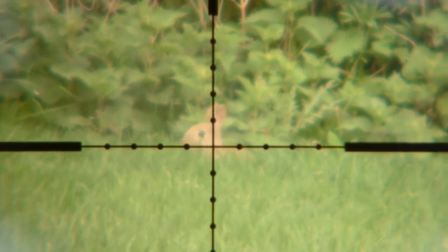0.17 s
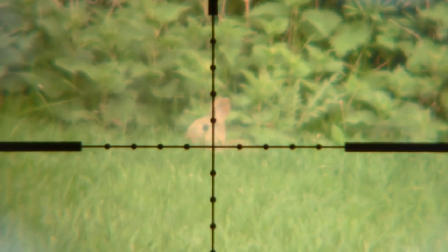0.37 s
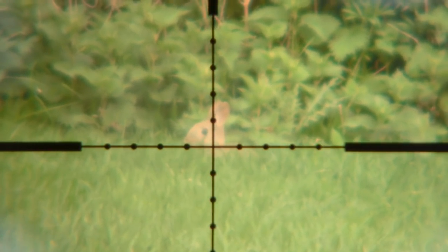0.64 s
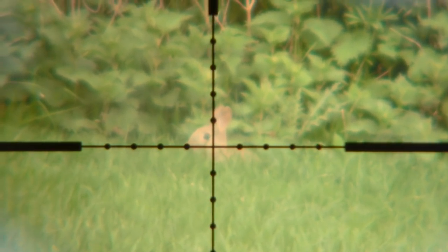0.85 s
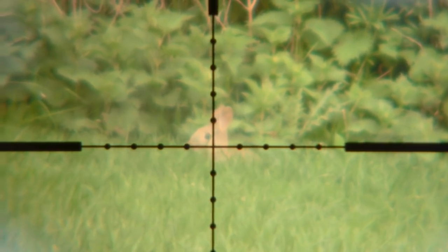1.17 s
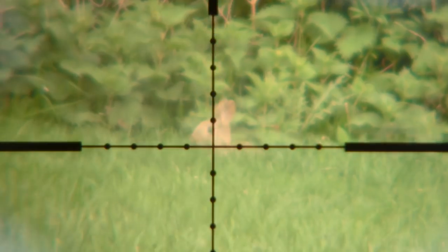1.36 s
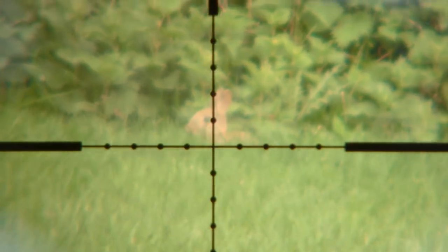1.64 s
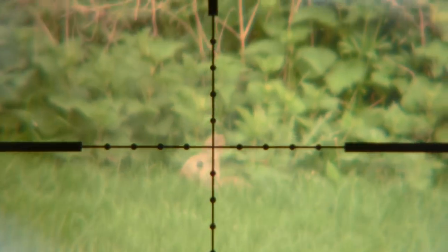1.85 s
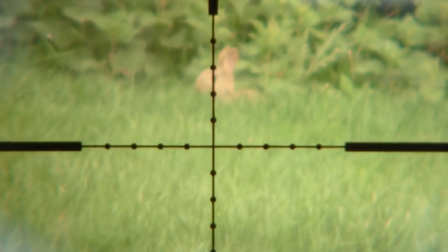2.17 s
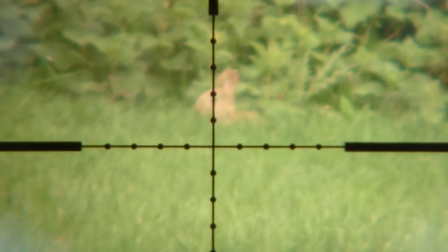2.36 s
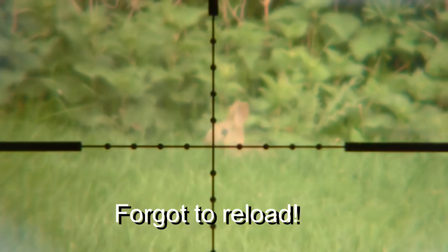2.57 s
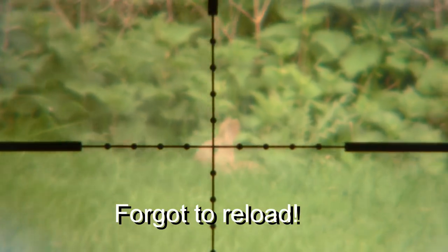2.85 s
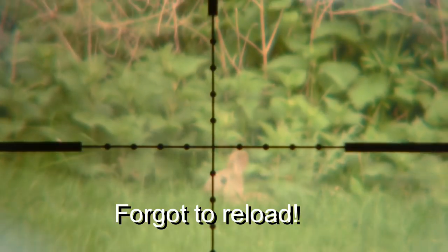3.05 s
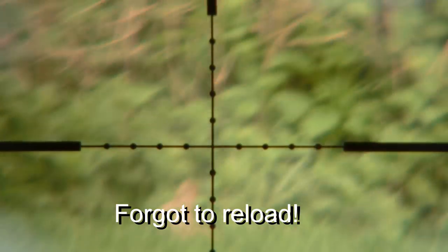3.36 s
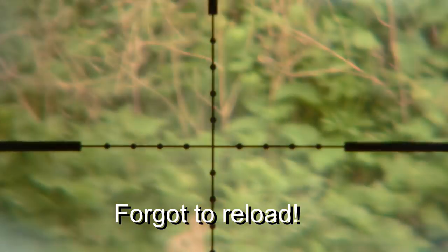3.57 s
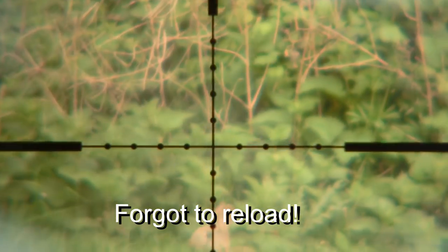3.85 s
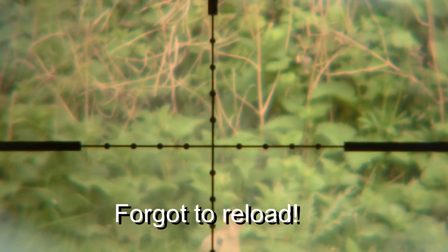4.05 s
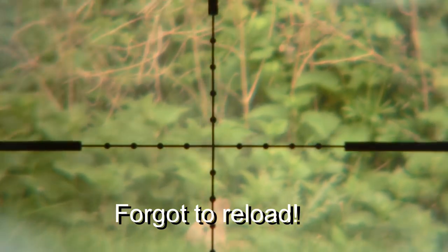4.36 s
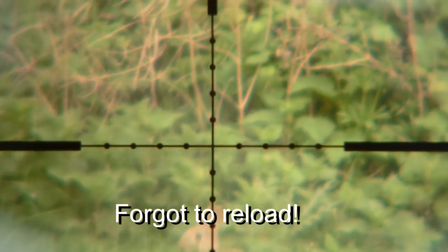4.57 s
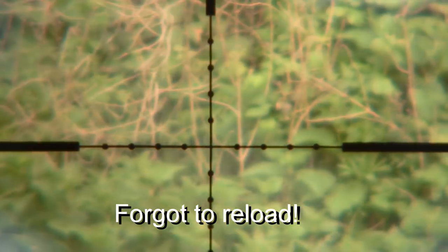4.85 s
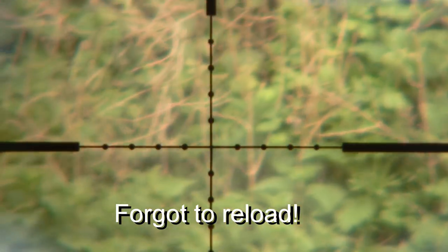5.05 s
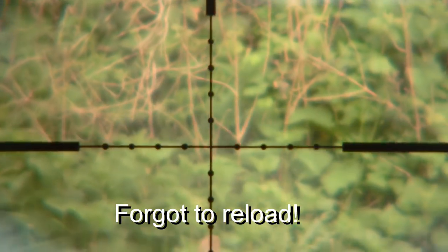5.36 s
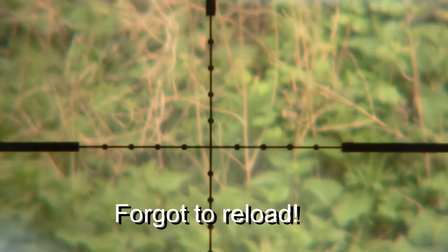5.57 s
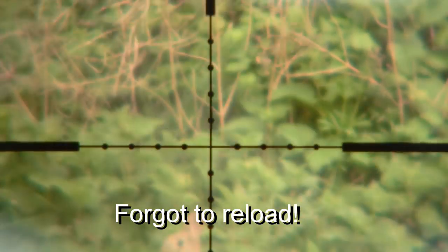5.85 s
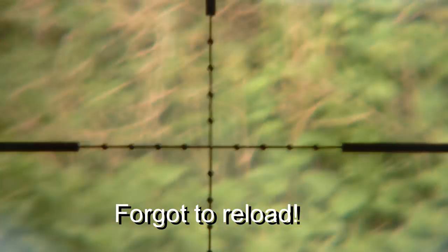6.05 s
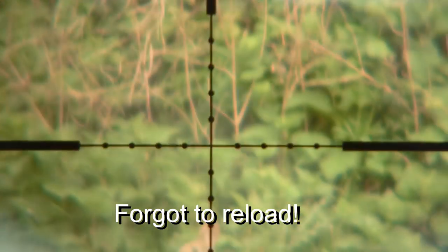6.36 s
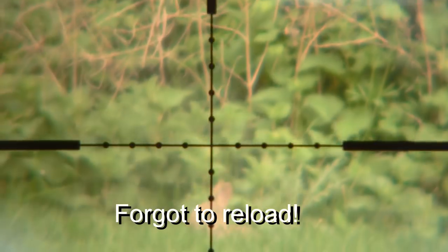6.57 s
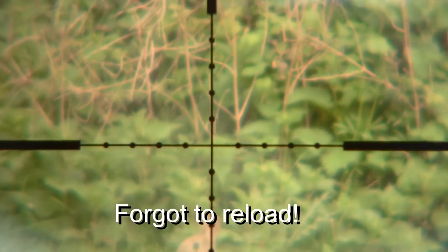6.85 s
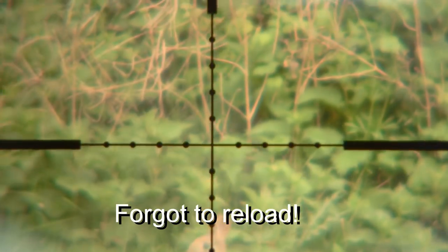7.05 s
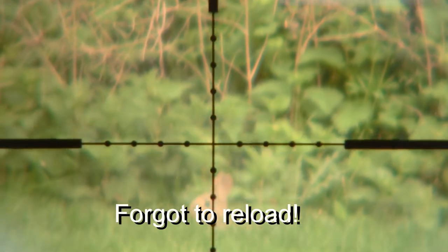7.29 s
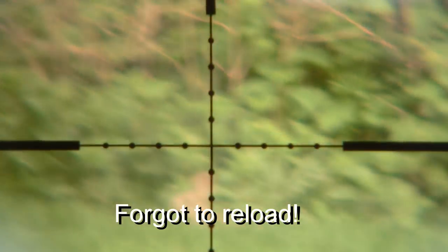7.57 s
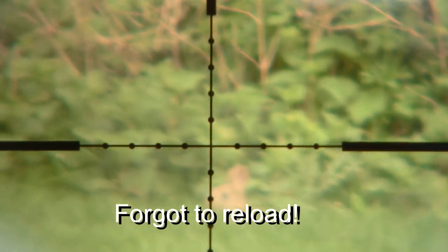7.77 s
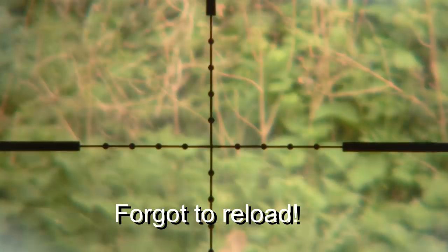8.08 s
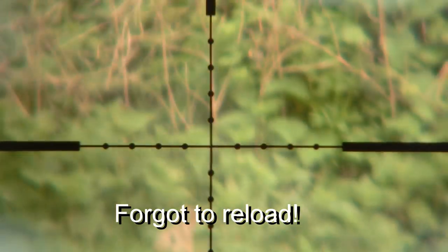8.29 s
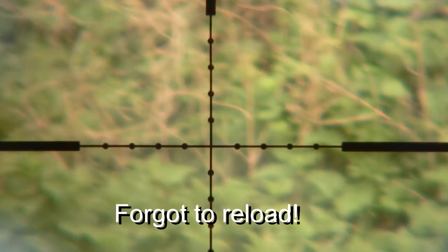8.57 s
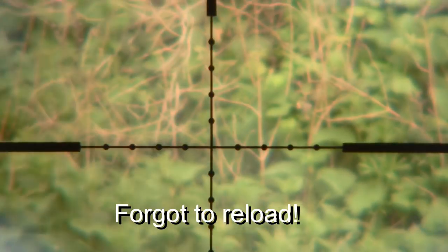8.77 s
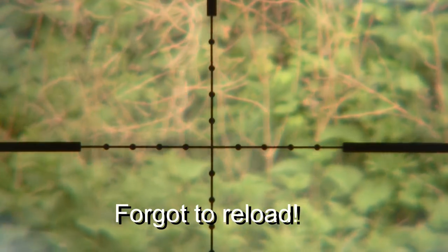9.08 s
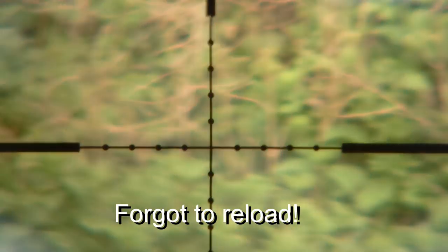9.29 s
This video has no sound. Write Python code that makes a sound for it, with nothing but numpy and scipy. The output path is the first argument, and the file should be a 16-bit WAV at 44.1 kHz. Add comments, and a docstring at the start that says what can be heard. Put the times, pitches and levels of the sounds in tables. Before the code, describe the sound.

Small bird chirps over soft outdoor hush, a rifle striker falls with an empty knock, then sharp metallic bolt clacks, taps and scrapes follow.

```python
"""A rifle with a camera on its scope is handled at the edge of a field.
The striker falls with a hollow pop, then the bolt is drawn, rattled and shut; contacts ring dying sines and
filtered noise for stock and steel, the softer the duller. Hand and sleeve add taps, rubbing, thumps and scrapes.
A small bird chirps in gliding tones from the hedge over a distant rush of noise; the background dips once."""
import sys
import numpy as np
from scipy import signal
from scipy.fft import rfft, irfft, next_fast_len
from scipy.io import wavfile
from scipy.ndimage import uniform_filter1d

SR = 44100
rng = np.random.default_rng(int(sys.argv[2]) if len(sys.argv) > 2 else 0)


def output_pcm(signal):
    """Save a mono or channel-first signal as 16-bit PCM at the path in sys.argv[1].

    Samples are clipped to [-1, 1] before scaling.
    """
    pcm = np.clip(np.atleast_2d(signal).T, -1, 1) * 32767
    wavfile.write(sys.argv[1], SR, np.round(pcm).astype(np.int16))


N = 415422
TIME = np.arange(N) / SR

# Clear modes of the rifle. Each row: pitch in Hz, level in dB, t60 in s, before each contact's own factors.
RIFLE_MODES = [(146, -19, 0.023), (230, -21.5, 0.034), (389.3, -3, 0.1), (475.4, -1, 0.043),
               (594, -1.5, 0.07), (643, 3, 0.058), (801, -8.5, 0.09), (910, -2, 0.03), (1088, 3, 0.046),
               (1400, -10, .035), (1546, 5, 0.036), (1905, -0.5, 0.055), (2074, 2.5, 0.039),
               (2280, -18.5, .035), (2860, -7, .03), (3244, 0, 0.054), (3680, -2.5, 0.054),
               (4320, 1, 0.028), (5380, 0, 0.0063), (7250, -3.5, 0.025), (7960, -10, 0.018),
               (8710, -3, 0.024), (10340, -9.5, 0.022), (12100, -4, 0.054)]
# Strokes of fingers and sliding steel along the rifle. Each row: start in s, length in s, level in dB.
STROKES = [(1.152, .8, -59.5), (2.287, .3, -57), (5.637, 0.26, -49), (6.038, .2, -42.5), (6.099, 0.94, -63),
           (7.4, .6, -58.5), (7.905, 0.83, -55), (9.156, 0.49, -60.5)]


def amp(db):
    """Decibels to gain."""
    return 10 ** (np.asarray(db) / 20)


def unit(x):
    """Scales to rms 1."""
    return x / np.sqrt(np.mean(x ** 2) + 1e-20)


def at_hz(points, hz):
    """Reads a spectrum on a log-frequency axis."""
    f, value = np.transpose(points)
    return np.interp(np.log(hz + 1), np.log(f + 1), value)


def level(curve):
    """Gain over the whole scene from rows of (s, dB)."""
    return amp(np.interp(TIME, *np.transpose(curve)))


def add(mix, s, sound):
    """Adds a sound at time s."""
    part = mix[round(s * SR):][:len(sound)]
    part += sound[:len(part)]


def colour(x, points, turn=1):
    """Filters by a spectrum in dB; turn shifts the phase."""
    size = next_fast_len(N + 4096)
    gain = amp(at_hz(points, np.fft.rfftfreq(size, 1 / SR)))
    return irfft(rfft(x, size) * turn * gain, size)[:N]


def drift(low_hz, high_hz):
    """Irregular waver of rms 1 from sines of random phase, the slower the stronger."""
    t = TIME[::256]
    rates_hz = np.geomspace(low_hz, high_hz, 24)
    waves = sum(np.sin(2 * np.pi * (f * t + rng.random())) / np.sqrt(f) for f in rates_hz)
    return np.interp(TIME, t, unit(waves))


def ring(modes, t):
    """Dying sines of alternating sign from rows of (Hz, dB, t60 s)."""
    return sum((-1) ** k * amp(db - 60 * t / t60) * np.sin(2 * np.pi * hz * t)
               for k, (hz, db, t60) in enumerate(modes))


def blow(x, db):
    """Gives a short sound the energy of 10 ms at this level."""
    return amp(db) * x * np.sqrt(SR / 100 / np.sum(x ** 2))


def ports(x, side):
    """Two close microphone ports hear one sound a little out of phase; which one leads changes with frequency."""
    hz = np.fft.rfftfreq(next_fast_len(N + 4096), 1 / SR)
    lead = np.tanh(4 * np.sin(2 * np.pi * np.log2(hz + 100)))
    difference = colour(x, side, turn=1j * lead)
    return np.array([x + difference, x - difference])


def echo(x, stretch):
    """Diffuse tail from leaves and ground, each band dying at its own speed."""
    # Echo off grass and hedge. Each row: frequency in Hz, t60 in s before the stretch.
    field_decay = [(150, .2), (700, 0.4), (2000, 0.33), (8000, 0.44), (15000, 0.1)]
    hz, t, z = signal.stft(rng.standard_normal(SR), SR, nperseg=256)
    decay = amp(-60 * t / (stretch * at_hz(field_decay, hz)[:, None]))
    onset = 1 - np.exp(-t / 0.0044)
    tail = signal.istft(z * decay * onset, SR)[1]
    return signal.fftconvolve(x, tail / np.linalg.norm(tail))[:N]


def dip():
    """Gain of the background: a quick fall, a hold and a slower recovery."""
    start_s, fall_s, hold_s, recover_s, depth_db = 4.69, 0.09, 0.63, 0.18, -4
    corners = start_s + np.cumsum([0, fall_s, hold_s, recover_s])
    return amp(np.interp(TIME, corners, [0, depth_db, depth_db, 0]))


def outdoors(air_db=-54.5, rush_db=-2, gust_db=0.4):
    """Steady rumble and hiss outside the dip, and a distant rush that swells slowly: noise, partly unlike per port."""
    # Spectrum of the open air. Each row: frequency in Hz, relative density in dB per Hz.
    air = [(12, -39.5), (20, -12), (65, 3), (123, -12.5), (277, -14.5), (446, -11), (642, -7), (738, -5),
           (897, -9.5), (1150, -20.5), (1610, -23), (2820, -28), (3630, -28.5), (14300, -34.5),
           (16000, -47)]
    # Spectrum of the distant rush. Each row: frequency in Hz, relative density in dB per Hz.
    rush = [(330, -25), (430, -18.5), (520, -12.5), (700, -1), (850, 0.5), (1020, -6), (1300, -18.5),
            (2200, -45.5), (5000, -44.5)]
    # Swell of the rush. Each row: time in s, level in dB before rush_db and the gusts.
    rush_swell = [(0.0, -59), (0.5, -62.5), (1.31, -51.5), (2.1, -61), (2.62, -56.5), (3.15, -60.5),
                  (3.57, -58), (4.09, -59.5), (4.54, -55), (4.83, -60), (6.09, -59.5), (6.19, -51.5),
                  (7.24, -54.5), (7.9, -51), (8.47, -44.5), (9.42, -48.5)]
    # Spread between the ports. Each row: frequency in Hz, side over mid in dB.
    air_side = [(60, -13), (130, -1), (290, -2), (700, -21.5), (1300, -7.5), (2400, -1.5), (4400, -1.5),
                (8000, 0.5), (15000, 0)]
    swell = level(rush_swell) * amp(rush_db + gust_db * drift(0.73, 13))
    mid, side = (dip() * amp(air_db) * unit(colour(rng.standard_normal(N), air))
                 + swell * unit(colour(rng.standard_normal(N), rush)) for _ in range(2))
    side = colour(side, air_side)
    return np.array([mid + side, mid - side])


def rubbing(resting_db=-69.5, slips_per_s=700, spread_db=4, hiss_db=-6, damping=0.51, arch=3.9):
    """Tiny slips of uneven size tap the rifle's modes, damped by the hand; each stroke swells and fades."""
    pressure = np.full(N, amp(resting_db))  # the hand that only holds the rifle
    for start, length, db in STROKES:
        arc = abs(np.sin(np.linspace(0, np.pi, round(length * SR))))
        add(pressure, start, amp(db) * arc ** arch)
    sizes = amp(spread_db * np.minimum(rng.exponential(1, N), 4))
    slips = (rng.random(N) < slips_per_s / SR) * rng.choice([-1, 1], N) * sizes
    damped = [(hz, db, t60 * damping) for hz, db, t60 in RIFLE_MODES]
    body = signal.fftconvolve(slips, ring(damped, np.arange(SR // 8) / SR))[:N]
    body = unit(body) + amp(hiss_db) * unit(slips)
    tone_db = [(120, 16), (400, 6.5), (650, -6.5), (2000, -14), (5000, -8), (14000, -20)]
    return pressure * unit(colour(body, tone_db))


def note(top_hz, length, wobble, rasp=.1, rasp_db=-5, fade=0.27):
    """One arch of pitch, ending a little lower than it began, with a raspy edge from a jittered second tone."""
    start, end, peak_at = 0.76, 0.75, 0.42  # shares of the top pitch, share of the length
    u = np.linspace(0, 1, round(length * SR))
    rise = np.minimum(u / peak_at, 1)
    fall = np.maximum((u - peak_at) / (1 - peak_at), 0)
    arch = start + (1 - start) * np.sin(np.pi / 2 * rise) - (1 - end) * fall
    pitch = top_hz * arch * wobble[:len(u)]
    jitter = 1 + rasp * unit(uniform_filter1d(rng.standard_normal(len(u)), size=40))
    clear = np.sin(2 * np.pi * np.cumsum(pitch) / SR)
    raspy = np.sin(2 * np.pi * np.cumsum(pitch * jitter) / SR)
    return (clear + amp(rasp_db) * raspy) * signal.windows.tukey(len(u), fade)


def birds(second_db=-2.5, waver=0.021, flutter_db=3.5, direct_db=-2.5, echo_db=-6.5, echo_stretch=1.0):
    """Fluttering two-note chirps and thin whistles, gliding tones blurred by the hedge."""
    # Chirps from the hedge, before throat, flutter and waver. Each row: start in s, top pitch in Hz, level in dB,
    # length of a note in s, delay of the second note in s, its top pitch in Hz.
    chirps = [(.279, 5370, -46.5, 0.05, 0.047, 4220), (0.496, 5330, -51.5, 0.054, 0.047, 4240),
              (.677, 5130, -56.5, 0.043, 0.038, 4080), (1.158, 4650, -53, 0.048, 0.057, 3560),
              (1.518, 5060, -48.5, 0.05, .056, 4040), (1.728, 4270, -57, 0.052, 0.053, 3530),
              (1.907, 4580, -56, 0.057, 0.049, 3560), (2.648, 5070, -60, .045, 0.046, 4040),
              (2.69, 5330, -53.5, 0.049, 0.055, 4230), (3.21, 3980, -68, 0.063, .065, 3320),
              (3.496, 4730, -56.5, 0.057, 0.052, 3590), (3.558, 4310, -56, 0.049, .062, 3480),
              (4.338, 5180, -50, 0.047, 0.044, 4210), (5.071, 4280, -55.5, 0.043, 0.059, 3590),
              (5.239, 4650, -53.5, 0.053, 0.046, 3600), (6.387, 4450, -54.5, 0.042, 0.051, 3630),
              (7.008, 5150, -56.5, 0.042, 0.051, 4060), (8.965, 4590, -56.5, 0.057, 0.049, 3500)]
    # Thin whistles of farther birds, before flutter and waver.
    # Each row: start in s, length in s, first pitch in Hz, last pitch in Hz, level in dB.
    whistles = [(1.002, 0.21, 2140, 2780, -65.5), (3.924, 0.43, 2360, 2292, -67.5),
                (5.332, 0.1, 2305, 2240, -57), (6.28, 0.18, 5960, 5900, -68),
                (6.778, 0.104, 4940, 5300, -64.5), (7.412, .1, 7200, 7160, -70)]
    # The bird's throat. Each row: frequency in Hz, gain in dB.
    throat = [(2500, 2), (3300, -2), (4200, 2), (4900, -5.5), (5600, -7)]
    out = np.zeros(N)
    wobble = 1 + waver * drift(30, 85)
    flutter = amp(flutter_db * drift(25, 90))
    for s, top_hz, db, length, delay, second_hz in chirps:
        for start, hz, note_db in [(s, top_hz, db), (s + delay, second_hz, db + second_db)]:
            add(out, start, amp(note_db) * note(hz, length, wobble[round(start * SR):]))
    out = colour(out, throat)
    for s, length, start_hz, end_hz, db in whistles:
        size = round(length * SR)
        pitch = np.linspace(start_hz, end_hz, size) * wobble[:size] ** .5
        tone = np.sin(2 * np.pi * np.cumsum(pitch) / SR)
        add(out, s, amp(db) * tone * signal.windows.tukey(size, .5))
    song = out * flutter
    return amp(direct_db) * song + amp(echo_db) * echo(song, echo_stretch)


def drive(law, db, dull_db):
    """Levels of the four parts: the softer the contact, the less reaches the high ones."""
    return np.array([db + offset_db - share * dull_db for offset_db, share in law])


def contact(levels, length=0.77, pitch=1.005, detune=0.01, place_db=5.5):
    """A contact rings the clear modes and a thicket of dense ones; steel speaks first, the stock follows."""
    # Stock, receiver, steel and tick. Each row: low edge in Hz, high edge in Hz, rise in s,
    # t60 of the dense modes in s before the length factor, their share in dB.
    parts = [(110, 900, 0.0014, 0.05, -5.5), (900, 2600, 0.0018, 0.046, -2),
             (2500, 5880, 0.00067, 0.023, 4), (6250, 13600, 0.00091, 0.011, 6)]
    out, t = 0, np.arange(SR // 6) / SR
    for db, (low, high, rise, t60, dense_db) in zip(levels, parts):
        band = signal.butter(3, [low, high], "band", fs=SR, output="sos")
        swell = 1 - np.exp(-t / rise)
        burst = rng.standard_normal(len(t)) * swell * amp(-60 * t / (t60 * length))
        dense = signal.sosfilt(band, burst)
        # the place of the blow shifts the modes a little and favours some
        modes = [(hz * pitch * (1 + detune * rng.standard_normal()),
                  mode_db + place_db * rng.standard_normal(), decay * length)
                 for hz, mode_db, decay in RIFLE_MODES if low <= hz < high]
        out = out + blow(unit(swell * ring(modes, t)) + amp(dense_db) * unit(dense), db)
    return out


def hand(tap_db=-4, tap_spread_db=3, tap_dull_db=20, count=4, length=0.83, pitch=1.03):
    """Knocks on the gripped stock; faint taps fall at random in every stroke, strongest in its middle."""
    # Knocks on the stock. Each row: time in s, level in dB, dullness in dB.
    knocks = [(1.153, -50.5, 17), (1.425, -53, 34), (2.456, -42.5, 25), (2.463, -42, 31), (3.366, -45, 57),
              (3.413, -52.5, 27), (5.093, -54.5, 17.5), (5.172, -41.5, 44), (5.812, -49.5, 24),
              (6.057, -41, 18), (6.065, -37.5, 33), (6.183, -45, 19), (6.2236, -39, 27), (6.27, -44.5, 45),
              (6.509, -43, 53), (6.56, -50.5, 51), (7.438, -49.5, 26), (7.467, -39, 54), (7.582, -40, 34),
              (7.609, -37, 20.5), (7.616, -39.5, 32), (7.914, -37, 27), (7.995, -45, 20), (8.02, -41.5, 34),
              (8.204, -44, 40), (8.328, -36, 32), (8.47, -32, 48), (8.553, -38.5, 24.5), (8.766, -46, 30)]
    # How flesh drives stock, receiver, steel and tick. Each row: offset in dB, share of the dullness lost.
    by_hand = [(1, 0.013), (8.5, 0.54), (0, 0.81), (-7.5, 1)]
    # Colour of a blow by the hand. Each row: frequency in Hz, gain in dB.
    flesh = [(150, -2.5), (380, 0.5), (520, 1), (1000, 1.5), (2000, -0.5), (5000, 2)]
    out = np.zeros(N)
    for s, db, dull_db in knocks:
        add(out, s, contact(drive(by_hand, db, dull_db), length, pitch))
    for start, span, db in STROKES:
        for place, force in rng.random((count, 2)):
            force_db = db + tap_db + tap_spread_db * (2 * force - 1)
            tap = contact(drive(by_hand, force_db, tap_dull_db), length, pitch)
            add(out, start + place * span, np.sin(np.pi * place) ** 2 * tap)
    return colour(out, flesh)


def thumps(rise=.004, cycles=5.6, overtone=2.05, overtone_db=-4.5):
    """A soft push rings two low modes, so damped that each falls 60 dB in a few cycles."""
    # Dull thumps as the hand and the whole rifle rock. Each row: time in s, level in dB, pitch in Hz.
    pushes = [(1.267, -44.5, 386), (1.289, -47, 187), (1.289, -41.5, 347), (2.461, -43.5, 151),
              (4.691, -41, 64), (5.02, -55, 473), (5.745, -36.5, 59.7), (6.096, -35.5, 75),
              (6.145, -34.5, 40.2), (6.346, -48.5, 520), (6.62, -42.5, 38.2), (7.795, -47, 510),
              (7.933, -34, 133), (7.937, -31.5, 280), (8.122, -47.5, 440), (9.279, -39, 242),
              (9.283, -34, 60)]
    out, t = np.zeros(N), np.arange(SR // 3) / SR
    for s, db, hz in pushes:
        modes = [(f, mode_db, cycles / f) for f, mode_db in [(hz, 0), (hz * overtone, overtone_db)]]
        add(out, s, blow(ring(modes, t) * (1 - np.exp(-t / rise)), db))
    return out


def scrapes(grain_db=3):
    """Dense, grainy friction hiss that dies as the sliding stops."""
    # The bolt slides or a sleeve brushes the stock. Each row: start in s, level in dB before colour, t60 in s.
    slides = [(1.42, -50, 1), (4.699, -40, 0.1), (5.75, -58, 0.1), (6.087, -36, 0.11), (6.152, -45.5, 0.59),
              (7.949, -46.5, 0.25), (9.29, -47, 0.14)]
    # Colour of the friction. Each row: frequency in Hz, gain in dB.
    friction = [(600, -13.5), (1800, 3.5), (4500, -1), (6000, 1.5), (8500, -2), (13000, -6), (16000, -8.5)]
    out, t = np.zeros(N), np.arange(SR // 2) / SR
    for s, db, t60 in slides:
        hiss = rng.standard_normal(len(t))
        grain = np.repeat(rng.standard_normal(len(t)), 64)[:len(t)]  # one force for every 64 samples
        swell = 1 - np.exp(-t / .004)
        add(out, s, blow(hiss * amp(grain_db * grain) * swell * amp(-60 * t / t60), db))
    return colour(out, friction)


def bolt(rebounds_s=(.0046, .0105), rebound_dull_db=13.5, chatter_s=.016):
    """Heavy blows rebound twice, each time duller; loose parts click and touch once more."""
    # Heavy blows of striker and bolt. Each row: time in s, steel level in dB, stock level in dB, dullness in dB,
    # step to each rebound in dB, factor on ring time, factor on pitch.
    blows = [(4.3, -28.5, -31, 3, -1.5, .95, .94), (4.6901, -24.5, -23, -3.5, -23, 0.84, 1.01),
             (5.741, -25, -23.5, 13, -5, 0.63, .99), (6.083, -26.5, -30.5, 14, -14, 0.67, .99),
             (6.102, -33.5, -34.5, 2.5, -4, .9, .99), (6.143, -38.5, -37, -6.5, -2, 0.53, .99),
             (6.2259, -29.5, -29, 26.5, -23, 0.61, 1), (7.934, -22, -27, 5, -6.5, 1, 1.02),
             (9.28, -21, -24, 11.5, -6.5, 0.63, 1.034)]
    # Light clicks of loose metal parts. Each row: time in s, level in dB, dullness in dB, second touch in dB
    # against the first.
    clicks = [(1.445, -78.5, -25.5, -17), (2.39, -59.5, 12, -18), (3.553, -58, 6, -13),
              (4.6873, -37.5, -13, -27), (4.79, -36.5, 29, -36), (5.685, -64, -7, -15),
              (5.713, -51.5, 15, -1), (6.066, -40, 17, -5), (6.123, -33.5, 19, -14), (7.694, -37, 32, -26),
              (7.895, -40.5, 8, -16), (7.927, -40, 8, -9), (8.257, -36, 35, -3), (8.419, -36, 23, -9),
              (8.445, -46, 1.5, -16), (8.496, -43.5, 15.5, -22), (9.3087, -26, 22, -18.5)]
    # How metal drives stock, receiver, steel and tick. Each row: offset in dB, share of the dullness lost.
    by_metal = [(1, 0.19), (0, 0.18), (0.5, 0.36), (0, 0.93)]
    # Colour of a blow by steel. Each row: frequency in Hz, gain in dB.
    steel = [(150, -2.5), (260, 1.5), (390, -2.5), (600, 2.5), (1200, 0.5), (2600, 0.5), (3600, -1.5),
             (8000, 1.5), (12000, -1.5)]
    out = np.zeros(N)
    for s, steel_db, stock_db, dull_db, rebound_db, length, pitch in blows:
        for k, delay in enumerate((0, *rebounds_s)):
            metal = drive(by_metal, steel_db, dull_db + k * rebound_dull_db)
            levels = np.r_[stock_db, metal[1:]]
            add(out, s + delay, contact(levels + k * rebound_db, length, pitch))
    for s, db, dull_db, chatter_db in clicks:
        add(out, s, contact(drive(by_metal, db, dull_db)))
        add(out, s + chatter_s, contact(drive(by_metal, db + chatter_db, dull_db)))
    return colour(out, steel)


def pop(rise=0.004, low_cut_hz=280):
    """A hard blow builds up a hollow ring in the action."""
    # Hollow rings. Each row: time in s, level in dB before the low cut, factor on pitch, factor on ring time.
    hollow_rings = [(4.2998, -13.5, 1.005, 1), (5.741, -30, 1.15, 0.51), (9.279, -20, 1.08, 0.72)]
    # Modes of the hollow ring. Each row: pitch in Hz, level in dB, t60 in s, before the factors.
    hollow = [(562.5, 1.5, 0.032), (934, -9.5, 0.032), (1075, -6, .03), (1445, -9, .03)]
    # Weak modes that sing on after it. Each row: pitch in Hz, level in dB, t60 in s, before the factors.
    singing = [(350, -30, .13), (645, -30, .27), (830, -31, .13), (1390, -25, .08)]
    out, t = np.zeros(N), np.arange(SR // 4) / SR
    for s, db, pitch, length in hollow_rings:
        modes = [(hz * pitch, mode_db, t60 * length) for hz, mode_db, t60 in hollow + singing]
        add(out, s, blow(ring(modes, t) * (1 - np.exp(-(t / rise) ** 3.9)), db))
    return signal.sosfilt(signal.butter(2, low_cut_hz, "high", fs=SR, output="sos"), out)


def spring(ping_hz=12230, split_hz=120):
    """A small spring rings: a close pair of very high modes beats as it dies."""
    # Pings of the spring. Each row: time in s, level in dB, t60 in s.
    pings = [(6.108, -42, 0.034), (6.145, -32.5, 0.12)]
    out, t = np.zeros(N), np.arange(SR // 4) / SR
    for s, db, t60 in pings:
        pair = [(ping_hz, 0, t60), (ping_hz - split_hz, -9, t60)]
        add(out, s, blow(ring(pair, t), db))
    return out


def scene(field_db=-30, bird_side_db=-7, lean_db=.4):
    """The rifle reaches the microphone through its own body; the field lies far behind."""
    # Spread of the rifle between the ports. Each row: frequency in Hz, side over mid in dB.
    rifle_side = [(110, -17), (380, -10), (700, -16.5), (1290, -18), (2380, 1), (4400, -12), (8120, -4),
                  (15000, -0.5)]
    # Balance of the rifle. Each row: frequency in Hz, left over right in dB.
    rifle_balance = [(200, 1), (380, -1.5), (1290, -0.5), (2380, -1), (4400, 2.5), (15000, 0.5)]
    action = bolt() + hand() + pop() + spring() + thumps()
    close = action + amp(field_db) * echo(action, 0.76) + rubbing() + scrapes()
    left, right = ports(close, rifle_side)
    rifle = np.array([colour(left, [(f, db / 2) for f, db in rifle_balance]),
                      colour(right, [(f, -db / 2) for f, db in rifle_balance])])
    field = outdoors() + dip() * ports(birds(), [(1, bird_side_db)])
    return rifle + field * amp([[lean_db], [-lean_db]])


def record(dry, edge_hz=15800):
    """The microphone colours the very top; full-scale limit, then the band limit."""
    # Response of the microphone. Each row: frequency in Hz, gain in dB.
    microphone = [(13000, 0), (14500, 3), (16000, -3)]
    heard = np.clip([colour(channel, microphone) for channel in dry], -1, 1)
    low_pass = signal.firwin(255, edge_hz, window=("kaiser", 8), fs=SR)
    return signal.oaconvolve(heard, low_pass[None], "same", axes=1)


dry = scene()
out = record(dry)
output_pcm(out)
```